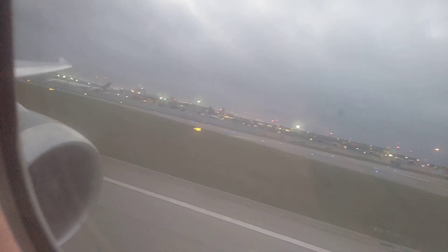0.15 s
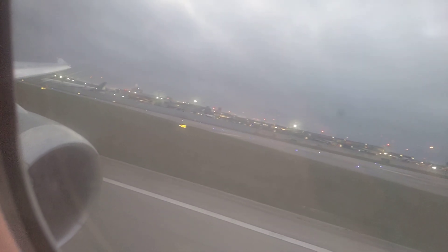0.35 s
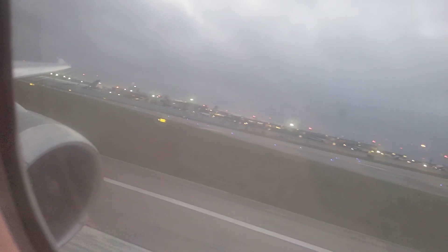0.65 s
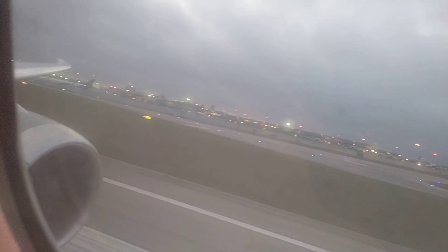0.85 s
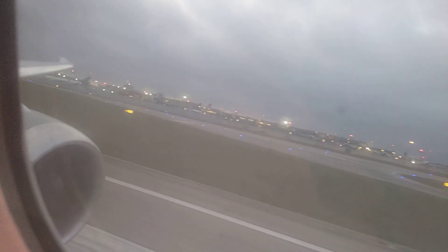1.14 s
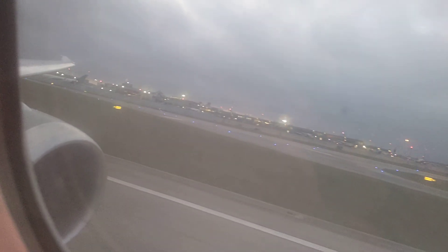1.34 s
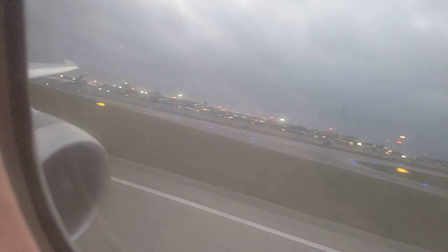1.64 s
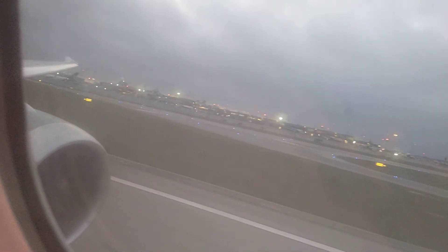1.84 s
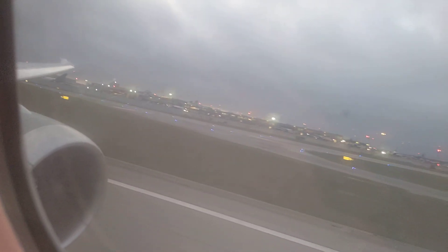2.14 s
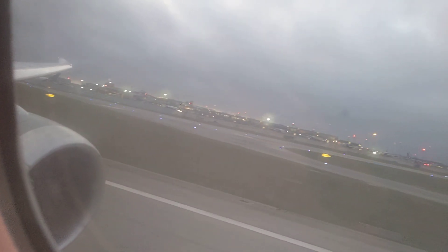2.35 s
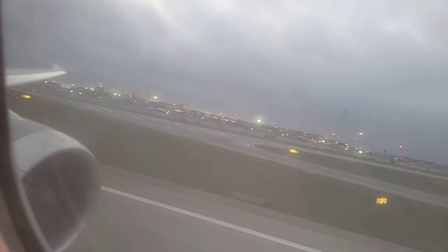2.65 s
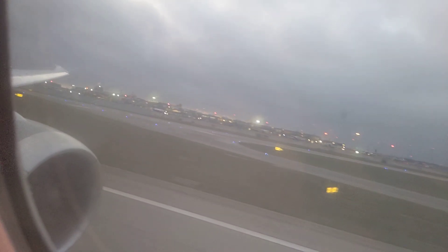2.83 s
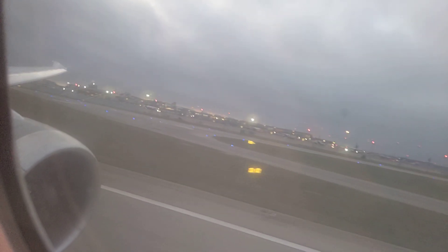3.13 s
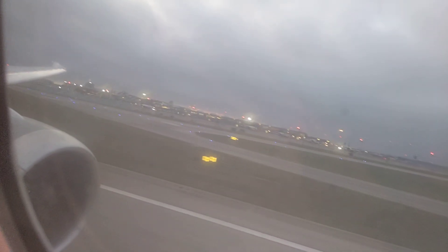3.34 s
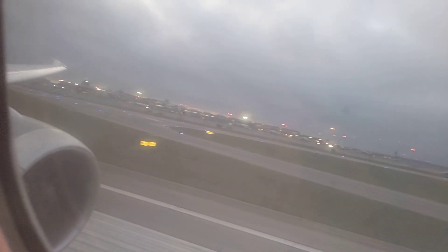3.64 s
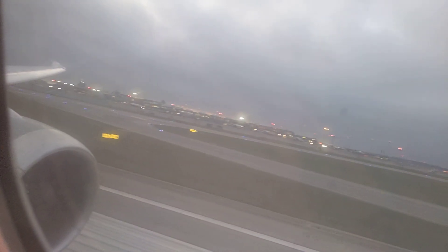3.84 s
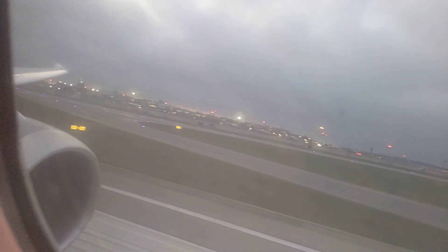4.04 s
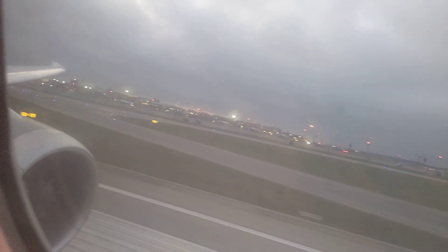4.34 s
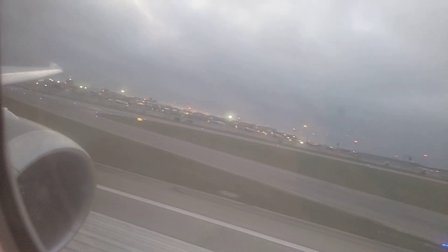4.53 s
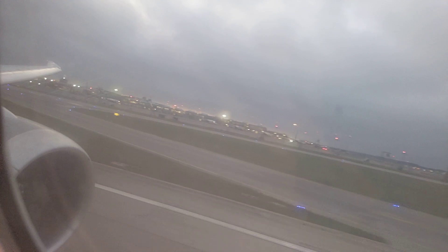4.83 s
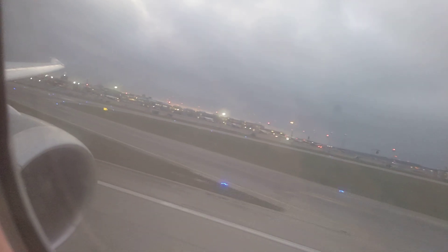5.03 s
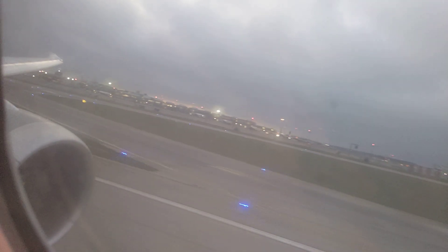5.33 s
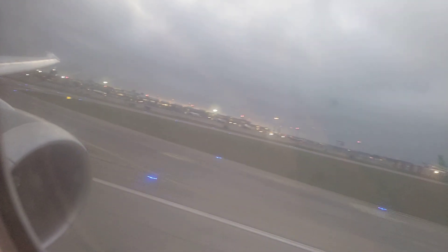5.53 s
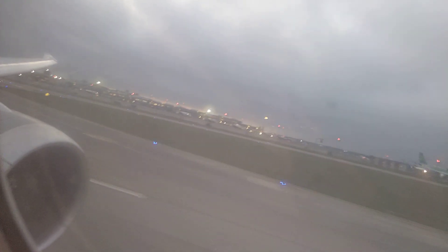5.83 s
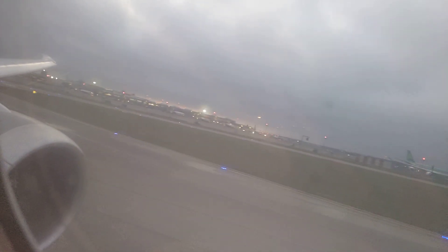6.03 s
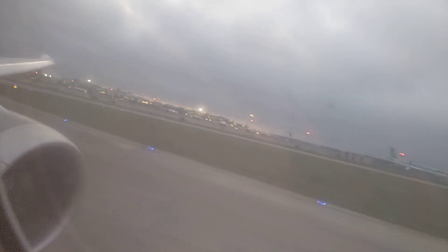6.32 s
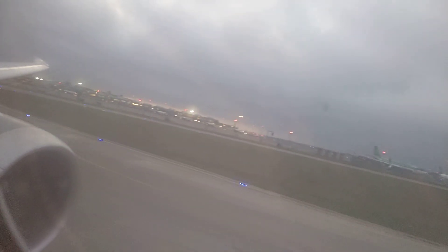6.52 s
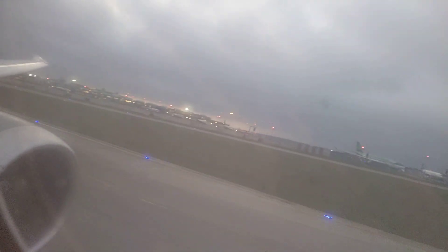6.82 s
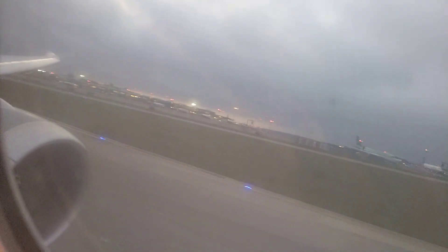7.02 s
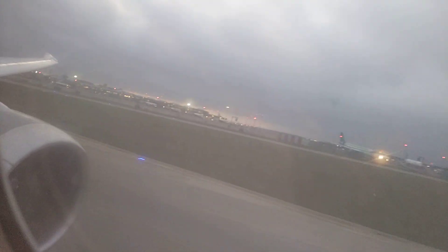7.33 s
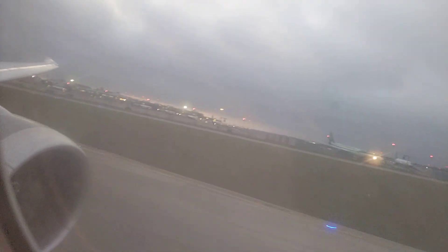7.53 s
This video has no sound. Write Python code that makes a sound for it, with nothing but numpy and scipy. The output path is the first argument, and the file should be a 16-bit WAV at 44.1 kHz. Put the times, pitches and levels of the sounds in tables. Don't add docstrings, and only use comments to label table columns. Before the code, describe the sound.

Dense jet roar and deep rolling-wheel rumble fill an aircraft cabin, with a buzzing engine tone on top and occasional faint plastic clicks.

```python
import sys
import numpy as np
from scipy import signal
from scipy.fft import rfft, irfft, next_fast_len
from scipy.io import wavfile
from scipy.ndimage import uniform_filter1d, minimum_filter1d

SR = 44100
rng = np.random.default_rng(int(sys.argv[2]) if len(sys.argv) > 2 else 0)


def waveform_to_disk(signal):
    frames = np.transpose(np.atleast_2d(signal))
    scaled = np.clip(frames, -1, 1) * 32767
    samples = np.round(scaled).astype(np.int16)
    wavfile.write(sys.argv[1], SR, samples)


def nominal_scale(level):
    x = np.asarray(level, float) / 20
    return 10 ** x


N = 338230
COARSE = 40
LOAD_EASING_S = 0.49


def columns(rows):
    s, *rest = np.transpose(rows)
    return [np.interp(np.arange(N) / SR, s, column) for column in rest]


def at_hz(points, hz):
    table_hz, values = np.transpose(points)
    return np.interp(np.log(hz), np.log(table_hz), values)


def rms_one(x):
    return x / np.sqrt(np.mean(x ** 2) + 1e-20)


def fine(coarse):
    return np.interp(np.arange(N) / COARSE, np.arange(len(coarse)), coarse)


def coarse_drift(rate_hz):
    settling = 2000
    pole = np.exp(-2 * np.pi * COARSE * rate_hz / SR)
    noise = rng.standard_normal(N // COARSE + 2 + settling)
    slow = signal.lfilter([1], [1, -2 * pole, pole * pole], noise)
    return rms_one(slow[settling:])


def drift(rate_hz):
    return fine(coarse_drift(rate_hz))


def swells(rows):
    t = np.arange(N // COARSE + 2) * COARSE / SR
    total_db = 0
    for middle_s, length_s, change_db in rows:
        place = np.clip((t - middle_s) / length_s, -.5, .5)
        total_db = total_db + change_db * np.cos(np.pi * place) ** 2
    return fine(total_db)


def easing(middle_s):
    return .5 + .5 * np.tanh((np.arange(N) / SR - middle_s) / LOAD_EASING_S)


def pan(db):
    return nominal_scale(np.multiply.outer([.5, -.5], db))


def tone(hz, db, lean_db, lead, flutter_db, spread):
    phase = 2 * np.pi * np.cumsum(hz + np.zeros(N)) / SR + rng.uniform(0, 2 * np.pi)
    between = lead + spread * drift(2.9)
    shared = coarse_drift(12)
    ears = np.array([shared + 0.72 * coarse_drift(5.1) for ear in "LR"])
    flutter = [fine(ear) for ear in rms_one(nominal_scale(flutter_db * ears))]
    wave = np.sin(phase + np.multiply.outer([.5, -.5], between))
    return np.sqrt(2) * nominal_scale(db) * pan(lean_db)[..., None] * wave * flutter


def hull_noise(shape, count, patchy_db, flicker_per_s):
    # f/Hz, width/Hz, boost/dB
    panels = [(47, 5.6, 5.5), (117, 57, 4.5), (184.7, 11.2, 5), (199.2, 9.8, 4.5), (321, 11, -2),
              (289, 18.5, 3.5), (362, 6.5, 3.5), (414, 21, -1.5), (500, 90, 4.5), (652, 38, -2),
              (610, 40, 2.5), (731, 13, -10), (1320, 32, 12), (4000, 83, 5.5), (6700, 600, 1.5)]
    # f/Hz, correlation [-1..1]
    likeness = [(30, .995), (60, 1), (130, 0.95), (290, 0.95), (640, 0.31), (1410, -0.14), (3100, 0.1),
                (15000, -0.18)]
    # f/Hz, left-right level/dB
    lean = [(60, 1.0), (110, 1.0), (200, 1), (380, 1.5), (700, 3), (1290, -5), (2380, -0.5), (4400, -1.5),
            (8120, -5), (15000, -2.5)]
    size = next_fast_len(N)
    hz = np.maximum(np.arange(size // 2 + 1) * SR / size, 1)
    colour_db = at_hz(shape, hz)
    for centre_hz, width_hz, boost_db in panels:
        colour_db = colour_db + boost_db / (1 + (2 * (hz - centre_hz) / width_hz) ** 2)
    low, high = shape[0][0], shape[-1][0]
    colour = nominal_scale(colour_db) * (hz > low) * (hz < high)

    alike = np.clip(at_hz(likeness, hz), -.99, .997)
    mid, side = rfft(rng.standard_normal((2, size)))
    pair = np.sqrt(1 + alike) * mid + np.sqrt(1 - alike) * side * [[1], [-1]]
    pair = pair * pan(at_hz(lean, hz)) * colour

    place = np.log(hz / low) / np.log(high / low) * (count - 1)
    together = coarse_drift(flicker_per_s * 1.1)
    out = 0
    for k in range(count):
        band = irfft(pair * np.clip(1 - np.abs(place - k), 0, 1), size)[:, :N]
        flicker = 0.33 * together + coarse_drift(flicker_per_s)
        out = out + band * fine(nominal_scale(patchy_db * flicker))
    return rms_one(out)


def evened(shape, level_db):
    noise = hull_noise(shape, count=2, patchy_db=0.0, flicker_per_s=8.3)
    power = uniform_filter1d(np.mean(noise ** 2, axis=0), size=SR // 10)
    own = np.sqrt(power + 0.057)
    return nominal_scale(level_db) * rms_one(noise / own ** 0.46)


def rattle():
    chance = 22 * nominal_scale(5.5 * drift(1.6)) / SR
    strength = nominal_scale(2.5 * np.minimum(rng.exponential(1, N), 3))
    clicks = (rng.random(N) < chance) * strength
    fall = nominal_scale(-60 / (0.047 * SR))
    bursts = signal.lfilter([1], [1, -fall], clicks + 1e-18) * rng.standard_normal((2, N))
    bright = signal.butter(2, [3800, 11500], "band", fs=SR, output="sos")
    return nominal_scale(-53) * pan(-4)[:, None] * signal.sosfilt(bright, bursts)


def ticks():
    # t/s, peak level/dB, centre f/Hz, width/octaves, tail level/dB
    cracks = [(.089, -43, 6370, 2.4, -12), (.346, -40, 8700, 0.2, -9), (1.170, -44, 11000, 1.1, -14),
              (1.777, -39, 6000, 2.6, -20), (1.888, -41, 9000, 1.4, -16), (1.984, -42, 4800, .6, -14),
              (2.050, -37, 8500, 1.8, -12), (2.108, -36.5, 7400, .6, -1), (2.180, -44, 7500, .6, -10),
              (2.478, -43, 9700, .35, 4), (2.541, -36, 3400, .7, -14), (3.245, -39, 4500, 1.8, -14),
              (5.099, -30, 6700, 0.63, -7), (5.341, -52, 10500, .3, -14), (5.362, -35, 6600, .6, -12),
              (5.485, -40, 6200, .6, -14), (5.522, -41, 6400, .3, -14), (5.553, -50, 13000, .7, -14),
              (6.468, -39, 7500, 2.4, -14), (6.589, -44, 11500, .9, -12), (6.766, -43, 11500, .9, -14)]
    out = np.zeros((2, N + SR))
    t = np.arange(SR // 5) / SR
    burst = rng.standard_normal((len(cracks), 2, len(t)))
    for (s, db, hz, octaves, tail_db), noise in zip(cracks, burst):
        decay = nominal_scale(-60 * t / 0.026) + nominal_scale(tail_db - 60 * t / 0.27)
        half_width = np.clip(octaves, .1, 3) * np.array([-.5, .5])
        edges = np.clip(hz * 2 ** half_width, 2400, 19000)
        sound = signal.sosfilt(signal.butter(2, edges, "band", fs=SR, output="sos"), noise * decay)
        sound = signal.sosfilt(signal.butter(2, 2600, "high", fs=SR, output="sos"), sound)
        at = round(s * SR)
        out[:, at:at + len(t)] += nominal_scale(db + 5.5) * pan(-4.6)[:, None] * sound / np.max(np.abs(sound))
    return out[:, :N]


def whines():
    # t/s, eighth multiple of the gear rate f/Hz
    core = [(0.0, 10866), (7.28, 10889), (7.67, 10881)]
    # multiple, level/dB, left-right level/dB, flutter/dB
    core_orders = [(1, -50, -5, 2.2), (6, -71, -5, 1.8), (8, -65, -5, 1.2), (10, -68.5, -5, 1.0)]
    # f/Hz, level/dB, left-right level/dB, flutter/dB
    accessories = [(2975, -64, -1.5, 2.5), (4312, -73, -2, 3), (5119, -69, -1.5, 2), (8006, -79, -3, 3),
                   (8807, -77, -3, 2.5), (10002, -75, -3, 2), (12240, -84, -3, 3.5)]
    pump_hz, pump_fade_s = 11198, .9
    pump_db = -67 - 5 * easing(pump_fade_s) + 1.0 * drift(1.5)
    out = tone(pump_hz, pump_db, .3, -1.3, flutter_db=1.1, spread=.8)
    gear_hz = columns(core)[0] / 8 + .5 * drift(8.8)
    for order, db, lean_db, flutter_db in core_orders:
        out += tone(order * gear_hz, db, lean_db, 1.0, flutter_db, spread=0.25)
    for steady_hz, db, lean_db, flutter_db in accessories:
        out += tone(steady_hz + 1.57 * drift(3.4), db, lean_db, .4, flutter_db, spread=0.43)
    return out


def fan():
    # t/s, level/dB
    blade_level = [(0, -28), (.4, -22), (1.1, -24.5), (1.4, -28.5), (2.1, -24.5), (2.48, -28),
                   (2.85, -23.5), (3.25, -22.5), (3.85, -23), (4.2, -27), (4.58, -23), (5.15, -27.5),
                   (5.6, -23.5), (6.35, -24), (6.6, -23), (7.67, -21.5)]
    # t/s, level/dB
    second_level = [
        (0, -42),
        (.4, -34),
        (1.1, -50),
        (1.8, -44),
        (2.75, -42.5),
        (3.7, -49),
        (5, -57),
        (6.5, -46.5),
        (7.45, -31),
        (7.67, -44),
    ]
    # middle t/s, length/s, rise/dB
    streaks = [(.85, .8, 6), (2.35, .9, 5.5), (3.4, 1.0, 8), (4.15, 1.0, 5.5), (5.28, 0.42, 6),
               (6.15, .8, 6), (7.4, 0.98, 5)]
    # multiple of shaft speed, level/dB, left-right level/dB, left lead/rad
    shaft_orders = [(4, -34, 1.5, .1), (6, -42, .5, .1), (15, -45, .2, .5), (90, -65, -2.5, 1.2)]
    blades = 18
    hz = 663.9 + .05 * np.arange(N) / SR
    first_db = columns(blade_level)[0] + .5
    second_db = columns(second_level)[0]
    third_db = -54.5 + swells(streaks)
    out = tone(hz + .4 * drift(4), first_db, -2.5, np.linspace(1.1, .1, N), flutter_db=.8, spread=.15)
    out += tone(2 * hz + 3 * drift(20), second_db, -4.6, 2.4, flutter_db=2.5, spread=.25)
    out += tone(3 * hz + 3.5 * drift(8), third_db, -.6, -.2, flutter_db=1.5, spread=0.43)
    for order, db, lean_db, lead in shaft_orders:
        out += tone(hz * order / blades, db, lean_db, lead, flutter_db=5.0, spread=1.0)
    side_hz, side_fade_s = 547, 1.8
    side_db = -30.5 - 15.5 * easing(side_fade_s)
    return out + tone(side_hz, side_db, 3.7, -0.83, flutter_db=1.5, spread=0.18)


def boom():
    # middle t/s, length/s, rise/dB
    mode_swells = [(.2, 0.46, 7.5), (.55, 0.22, 10), (1.13, 0.19, 14.5), (1.41, 0.14, 10), (1.8, 0.32, 12),
                   (2.02, 0.41, 14), (2.27, 0.38, 12), (3.3, 0.29, 9), (3.54, 0.21, 13), (3.72, 0.25, 13.5),
                   (4.0, 0.44, 5.5), (4.25, 0.21, 14), (4.48, 0.32, 13), (5.0, 0.55, 7), (5.6, 0.46, 6),
                   (5.87, 0.37, 8), (6.27, 0.24, 8), (6.65, 0.46, 7.5), (7.63, 0.17, 14)]
    mode_hz = 118.35 + 2.31 * drift(9.0)
    return tone(mode_hz, -23 + swells(mode_swells), 2.1, .05, flutter_db=1.3, spread=0.06)


def roar():
    # f/Hz, level/dB per Hz
    roar_shape = [(100, -34.5), (175, -1.5), (237, -2.5), (361, -4), (578, -14), (605, -11.5), (628, -13),
                  (661, -3.5), (696, -7.5), (732, -18), (800, -26), (1040, -38), (1760, -120)]
    # f/Hz, level/dB per Hz
    hiss_shape = [(440, -34), (740, 0), (1140, -6), (1330, -9), (1450, -7), (1950, -9), (2210, -13),
                  (3590, -19), (4030, -20.5), (4460, -22), (6710, -23.5), (9590, -32), (11200, -36),
                  (13200, -36.5), (15600, -46)]
    t = np.arange(N) / SR
    roar_db = -18.5 - 0.1055 * t
    hiss_db = -32.5 - 0.0931 * t
    body = nominal_scale(roar_db) * hull_noise(roar_shape, count=3, patchy_db=0.47, flicker_per_s=21.0)
    hiss = nominal_scale(hiss_db) * hull_noise(hiss_shape, count=6, patchy_db=0.51, flicker_per_s=6.7)
    return body + hiss


def rumble():
    # f/Hz, level/dB per Hz
    rumble_shape = [(13, -51), (22, -25.5), (40, -6), (75, 10), (124, -1.5), (150, -11.5), (200, -12),
                    (330, -120)]
    # f/Hz, level/dB per Hz
    thrum_shape = [(120, -18), (130, 1), (150, -1.5), (172, -9), (184, -31)]
    # middle t/s, length/s, change/dB
    runway = [(.5, 0.18, 3.5), (1.0, 0.15, 3), (1.28, 0.11, -9), (1.97, 0.39, -6), (2.65, 0.59, -3),
              (2.92, 0.15, 4), (3.45, .3, 2.5), (3.92, 0.25, 5.5), (4.4, .4, 2), (4.8, 0.15, 3.5),
              (5.32, 0.21, 3.5), (5.55, 0.25, -1.5), (5.82, .35, 4), (6.05, 0.18, 5), (6.45, 0.32, 2.5),
              (6.92, 0.46, 2), (7.25, 0.15, -8.5), (7.58, 0.12, 5)]
    # middle t/s, length/s, change/dB
    joints = [
        (.48, .2, 10.5),
        (1.48, 0.21, 3),
        (1.97, 0.21, 7),
        (2.62, .2, 7),
        (3.65, .3, -2),
        (4.12, 0.2, 11),
        (4.62, 0.52, -12),
        (6.1, .25, 0),
        (7.35, 0.14, 11),
    ]
    return evened(rumble_shape, -14 + swells(runway)) + evened(thrum_shape, -24 + swells(joints))


def scene():
    return rattle() + ticks() + whines() + fan() + boom() + roar() + rumble()


def low_pass(x):
    return signal.sosfilt(signal.butter(12, 15790, fs=SR, output="sos"), x)


def record(dry):
    over = np.minimum(1, .93 / (np.max(np.abs(dry), axis=0) + 1e-9))
    gain = uniform_filter1d(minimum_filter1d(over, size=SR // 100), size=SR // 200)
    gain *= np.clip((N - np.arange(N)) / (.004 * SR), 0, 1)
    return low_pass(dry * gain)


dry = scene()
out = record(dry)
waveform_to_disk(out)
```